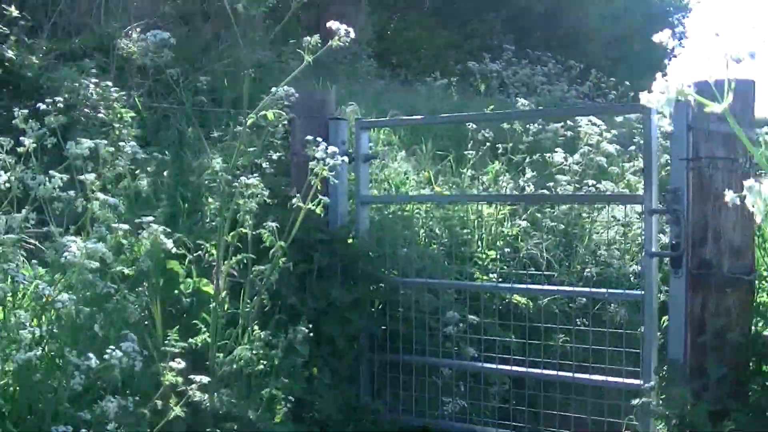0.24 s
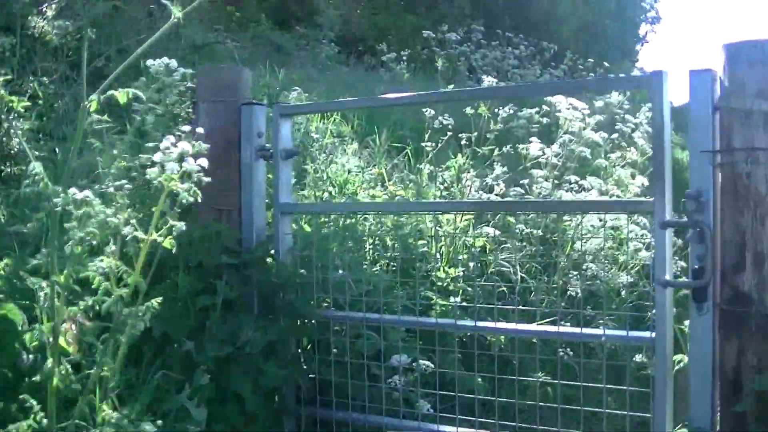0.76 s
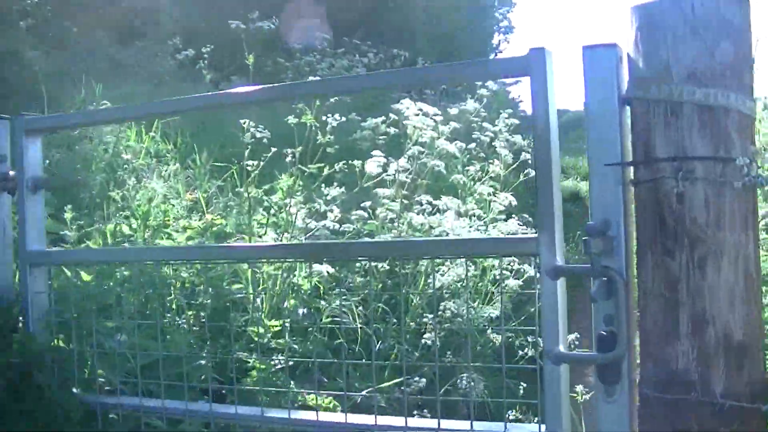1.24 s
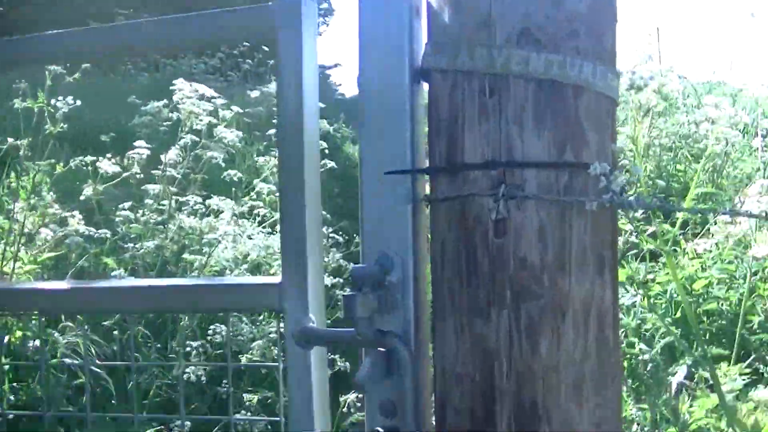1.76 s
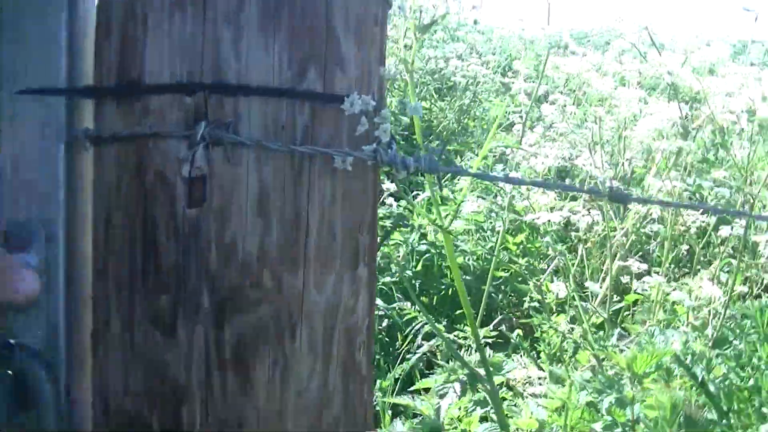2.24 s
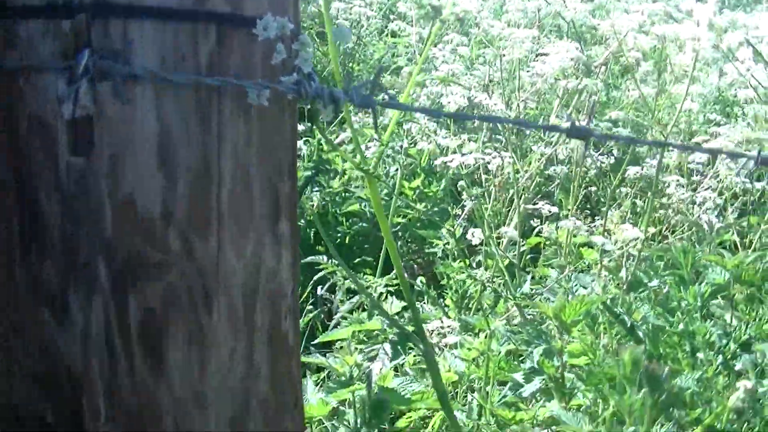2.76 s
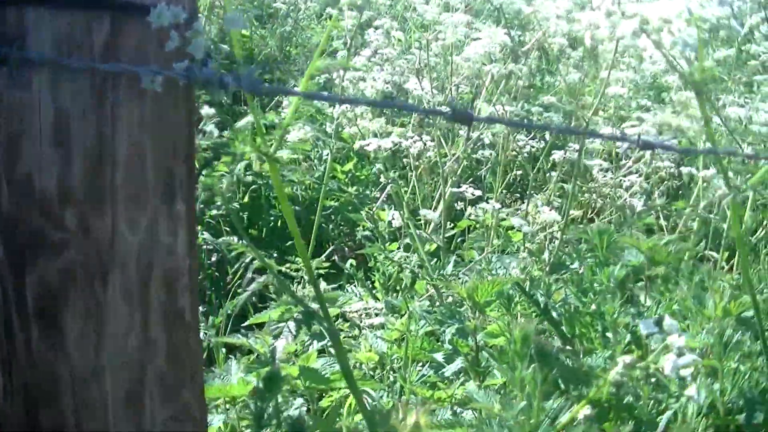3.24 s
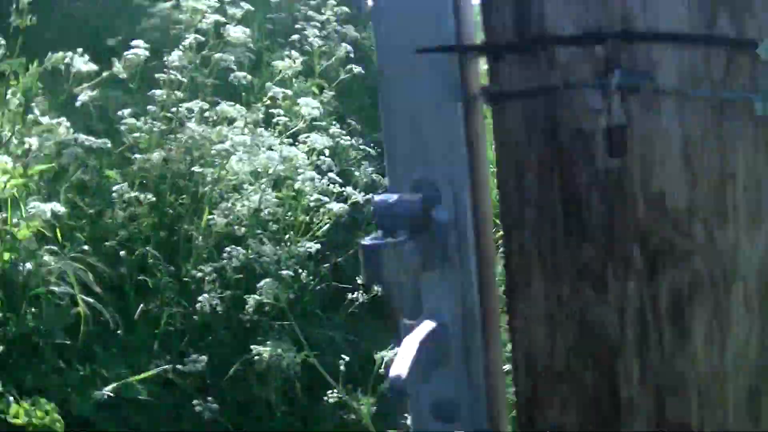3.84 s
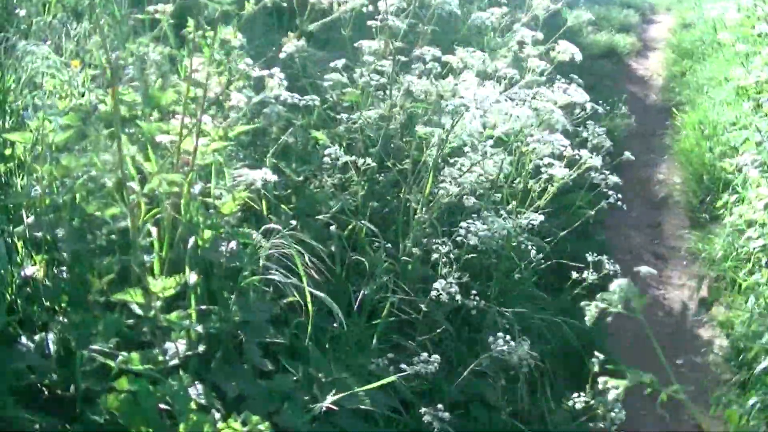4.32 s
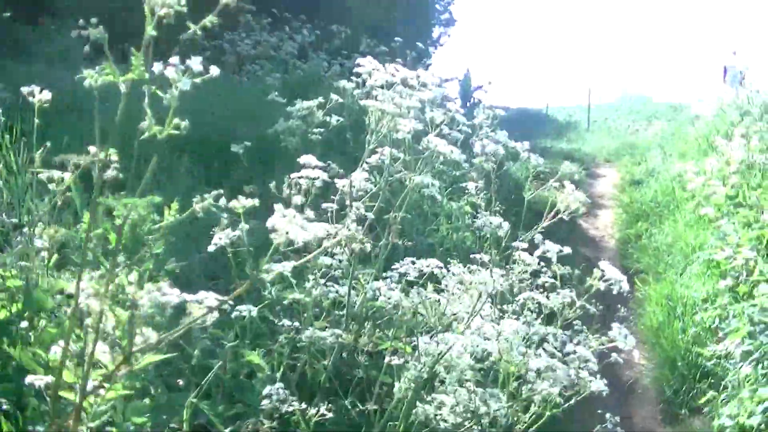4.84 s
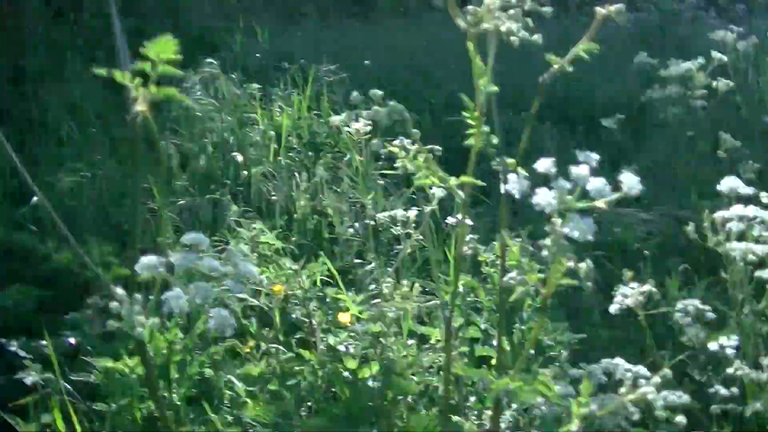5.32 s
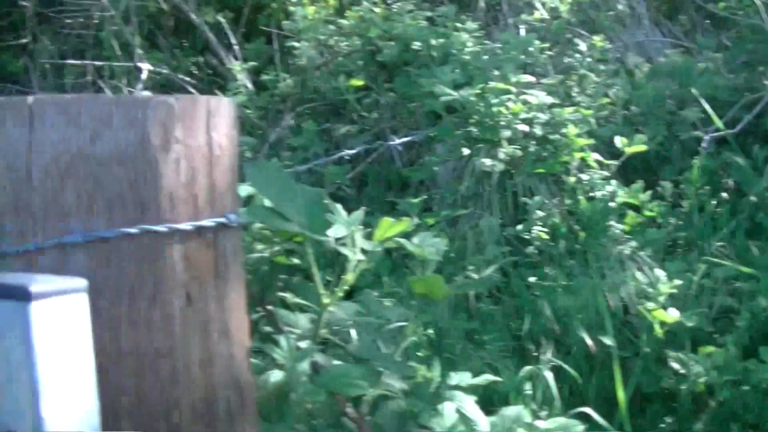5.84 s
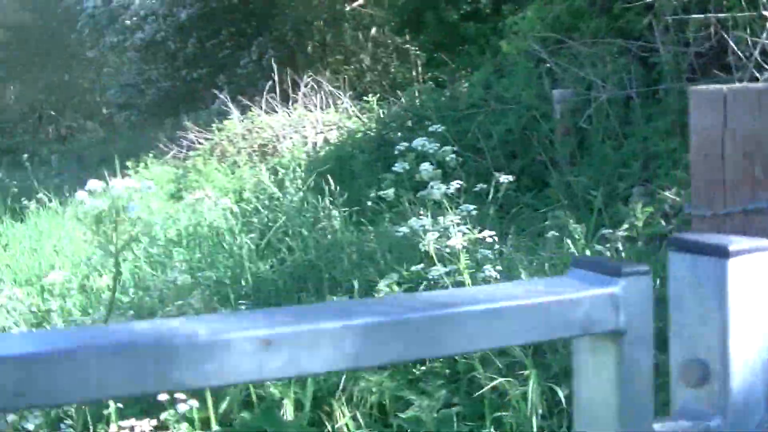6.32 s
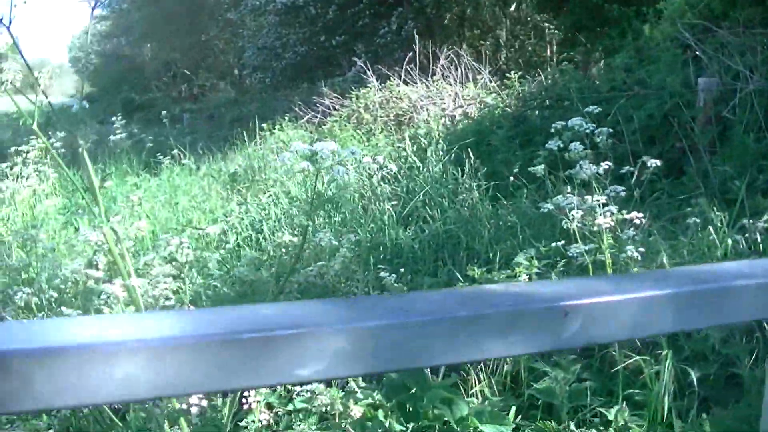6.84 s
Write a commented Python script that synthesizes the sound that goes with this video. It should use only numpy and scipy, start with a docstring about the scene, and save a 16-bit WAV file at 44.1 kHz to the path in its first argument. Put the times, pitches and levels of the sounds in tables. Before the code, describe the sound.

A faint hiss of leaves runs throughout, outdoors on an overgrown path. For the first two seconds soft footsteps swish through grass, with a few small bird chirps around 1 second. At about 2.3 seconds the steel bolt of a gate clinks loudly and close, in a quick cluster, followed by scattered lighter taps and another sharp clink near 3.1. From 3.3 to 3.6 seconds it clatters, scrapes and gives a short, very high squeal. Quiet steps resume from 4.3 seconds. A small bird sings falling notes and short buzzes between 5 and 5.9 seconds, and a twig snaps near 5.5. After one firmer step, the gate slams at about 6.6 seconds with a loud, bright metallic clang and a rattle of wire mesh. The bolt clinks and scrapes home by 6.9 seconds as the ringing fades.

```python
"""The spring bolt of a galvanised field gate clinks in its keeper, then scrapes and squeals as it is drawn.
Impacts excite the free vibration of bolt and post; stick-slip friction sustains the squeal.
Later the gate slams: the tube frame clangs, the wire mesh rattles and the bolt slides home.
Behind it a walker brushes along an overgrown path, small birds sing and leaves rustle."""
import sys
import numpy as np
from scipy import signal
from scipy.fft import rfft, irfft, next_fast_len
from scipy.io import wavfile
from scipy.ndimage import uniform_filter1d

SR = 44100
rng = np.random.default_rng(int(sys.argv[2]) if len(sys.argv) > 2 else 0)


def dump_mix(stems):
    """Bounce the given channels to the path in sys.argv[1] as a 16-bit WAV at rate SR."""
    frames = np.atleast_2d(stems).T  # one column per channel
    limited = np.clip(frames, -1, 1)  # hard clip at full scale
    pcm = np.round(limited * 32767).astype(np.int16)
    wavfile.write(sys.argv[1], SR, pcm)


N = 312228
TIME = np.arange(N) / SR


def amp(db):
    """Amplitude ratio of a level in decibels."""
    return 10 ** (np.asarray(db) / 20)


def unit(x):
    """Normalisation to an rms of one."""
    return x / np.sqrt(np.mean(x ** 2) + 1e-20)


def blend(ends, share):
    """Linear interpolation between two values as share goes from 0 to 1."""
    return ends[0] + (ends[1] - ends[0]) * share


def pan(db):
    """Level difference: stereo gains with the left db above the right."""
    return amp([[db / 2], [-db / 2]])


def curve_at(points, hz):
    """Interpolation on a logarithmic frequency axis."""
    f, value = np.transpose(points)
    return np.interp(np.log(hz + 1), np.log(f), value)


def add(mix, start, sound):
    """Superposition of a sound on the mix from start seconds."""
    part = mix[:, round(start * SR):][:, :sound.shape[1]]
    part += sound[:, :part.shape[1]]


def colour(x, spectrum):
    """Filtering by a spectral envelope in dB."""
    n = x.shape[-1]
    size = next_fast_len(n)
    gain = amp(curve_at(spectrum, np.fft.rfftfreq(size, 1 / SR)))
    return irfft(rfft(x, size) * gain, size)[..., :n]


def high_pass(x, hz):
    """Radiation loss: thin steel and twigs give out little bass."""
    return signal.sosfilt(signal.butter(2, hz, "high", fs=SR, output="sos"), x)


def wobble(n, rate_hz):
    """Random modulation: low-pass noise with an rms of one."""
    f = np.fft.rfftfreq(n, 1 / SR)
    return unit(irfft(rfft(rng.standard_normal(n)) / (1 + (f / rate_hz) ** 4), n))


# Likeness of left and right. Each row: frequency in Hz, correlation.
COHERENCE = [(60, 0.084), (250, 0.22), (600, 0.5), (1300, 0.83), (3000, 0.82), (5000, 0.47), (9000, 0.23),
             (16000, 0.37)]
def noise(n, spectrum, grain=1):
    """Partly coherent stereo noise, narrowest in the mids; an uneven grain makes it crackle."""
    size = next_fast_len(n)
    a, b = rfft(rng.standard_normal((2, n)) * grain, size)
    correlation = np.clip(curve_at(COHERENCE, np.fft.rfftfreq(size, 1 / SR)), -1, 1)
    mid, side = a * np.sqrt(1 + correlation), b * np.sqrt(1 - correlation)
    stereo = irfft(np.array([mid + side, mid - side]), size)[:, :n]
    return unit(colour(stereo, spectrum))


def dense_ring(n, spectrum, decay):
    """Modal overlap: countless modes merge into noise, each band with its own 60 dB decay time."""
    hz, t, bands = signal.stft(noise(n, spectrum), SR, nperseg=256)
    fade = 1e-3 ** (t / curve_at(decay, hz)[:, None])
    return signal.istft(bands * fade, SR, nperseg=256)[1][:, :n]


def ring(n, modes, spread_hz):
    """Free vibration: damped sines, the higher ones further out of phase between left and right."""
    t, out = np.arange(n) / SR, np.zeros((2, n))
    for hz, db, pan_db, t60 in modes:
        phase = 2 * np.pi * rng.random() + np.array([[min((hz / spread_hz) ** 2, 1.4)], [0]])
        out += amp(db) * pan(pan_db) * 1e-3 ** (t / t60) * np.sin(2 * np.pi * hz * t + phase)
    return out * (1 - np.exp(-t / 0.00032))  # the ring builds up during the contact


def scatter(sound, spectrum, decay):
    """Reverberation from foliage: convolution with a diffuse, decaying impulse response."""
    response = dense_ring(SR, spectrum, decay)
    return signal.fftconvolve(sound, response / np.linalg.norm(response[0]), axes=1)[:, :N]


# Spectrum of the leaf hiss. Each row: frequency in Hz, relative level in dB.
LEAF_SPECTRUM = [(18, -56), (30, -22), (161, -16.5), (486, -5.5), (721, -11.5), (1130, -11), (2010, -2),
                 (3060, -0.5), (4420, -4.5), (5040, -4), (7270, -10), (7870, -9.5), (11100, -16),
                 (13300, -14), (16000, -27.5)]
# Level of the background leaf rustle, dipping while the walker pauses.
# Each row: time in seconds, level in dB.
LEAF_RUSTLE_LEVELS = [(0, -53), (1.2, -52.5), (2.3, -52), (2.85, -56.5), (3.7, -52.5), (5.2, -50),
                      (5.8, -52), (7.08, -49.5)]
def leaf_rustle(patchy_db=2, flutter_db=-0.86):
    """Modulated noise: leaves hiss in patches that drift in time and frequency."""
    bands = signal.stft(noise(N, LEAF_SPECTRUM), SR, nperseg=512)[2]
    patches = uniform_filter1d(rng.standard_normal(bands.shape[1:]), size=8, axis=0)
    patches = unit(uniform_filter1d(patches, size=12, axis=1))
    hiss = signal.istft(bands * amp(patchy_db * patches), SR, nperseg=512)[1][:, :N]
    strength = amp(np.interp(TIME, *np.transpose(LEAF_RUSTLE_LEVELS)))
    return unit(hiss) * strength * amp(flutter_db * wobble(N, rate_hz=20)) * pan(0.6)


def glide(hz, octaves):
    """Exponential sweep centred on hz: its first, middle and last pitch."""
    return hz * 2 ** (octaves * np.array([-.5, 0, .5]))


# Single chirps. Each row: start in seconds, length in seconds, pitch in Hz, glide in octaves,
# relative level in dB, rasp as a share of the pitch.
BIRD_CHIRPS = [(0.868, 0.012, 3570, -.55, -33, 0.15), (0.87, 0.011, 5500, -.5, -35.5, 0.14),
               (0.916, 0.017, 3590, .55, -35.5, 0.17), (0.918, 0.02, 5500, .45, -39, 0.085),
               (0.995, 0.019, 2145, .65, -42, 0.034), (1.807, 0.049, 3340, .7, -46.5, .01),
               (3.186, 0.059, 3660, -.15, -47, 0.048), (4.031, 0.093, 4030, .15, -41.5, 0.099),
               (4.852, 0.026, 4290, .15, -38, 0.025)]
# Falling two-voiced slurs open a song. Each row: start in seconds, first pitch in Hz, relative level in dB.
SONG_SLURS = [(4.975, 5470, -40), (5.108, 5390, -45), (5.219, 5680, -45)]
# Buzzes end it. Each row: start in seconds, length in seconds, relative level in dB.
SONG_BUZZES = [(5.496, .04, -33), (5.595, 0.046, -35.5), (5.682, 0.044, -36.5), (5.736, 0.08, -48),
               (5.806, 0.057, -37)]
def bird_notes(twitters=8, twitter_span_s=(0.92, 1.6), twitter_hz=(3050, 4580), slur_s=0.084):
    """Pitch contours, each as start and length in seconds, three pitches in Hz, level in dB, rasp."""
    notes = [(start, length, glide(hz, octaves), db, rasp)
             for start, length, hz, octaves, db, rasp in BIRD_CHIRPS]
    for when, pitch, direction in rng.random((twitters, 3)):  # a far bird twitters at random
        sweep = glide(blend(twitter_hz, pitch), octaves=0.34 * np.sign(direction - .5))
        notes.append((blend(twitter_span_s, when), .035, sweep, -49, 0.0092))
    fall = np.linspace(0, 1, 3) ** 1.5
    for start, hz, db in SONG_SLURS:
        lower, upper = hz * 2 ** (-0.29 * fall), 1.24 * hz * 2 ** (-0.087 * fall)
        notes += [(start, slur_s, lower, db, 0.021), (start, slur_s, upper, db - 6.5, 0.021)]
    return notes + [(start, length, (4950, 4560, 4620), db, .048) for start, length, db in SONG_BUZZES]


def birds(direct_db=-1, echo_db=-3):
    """Frequency modulation makes gliding whistles raspy; hedge and trees scatter them."""
    song = np.zeros((2, N))
    for start, length, pitches, db, rasp in bird_notes():
        progress = np.arange(round(length * SR)) / (length * SR)
        hz = np.polyval(np.polyfit([0, .5, 1], pitches, 2), progress)
        hz *= 1 + rasp * wobble(SR // 4, rate_hz=740)[:len(progress)]
        whistle = np.sin(2 * np.pi * np.cumsum(hz) / SR)
        add(song, start, amp(db) * np.sin(np.pi * progress) * whistle[None])
    echo = scatter(song, spectrum=[(1000, 0), (8000, 0)], decay=[(2000, 0.18), (7000, 0.65)])
    return amp(direct_db) * song + amp(echo_db) * echo


# Steps in grass. Each row: start in seconds, length in seconds, swish level in dB, weight from 0 to 1.
FOOTFALLS = [(0.19, 0.041, -50.5, .6), (0.418, 0.12, -45.5, 0.28), (0.72, 0.062, -49, 0.94),
             (0.96, 0.064, -45.5, 0.4), (1.175, 0.14, -49.5, 0.48), (1.671, 0.046, -42.5, 0.77),
             (2.128, 0.035, -34, 0.57), (4.297, 0.049, -40.5, 0.45), (4.476, 0.06, -44, .15),
             (4.744, 0.13, -37.5, 0.01), (4.969, 0.0093, -39, 0.83), (5.149, 0.12, -48.5, .5),
             (5.361, 0.07, -43.5, 0.23), (5.578, 0.084, -46.5, .25), (6.387, 0.067, -31.5, 0.59)]
# Spectra of stems, footfall and twig. Each row: frequency in Hz, relative level in dB.
SWISH_SPECTRUM = [(120, -70), (200, -45), (432, -12), (806, -15.5), (2470, -1.5), (4430, -6), (6880, -6),
                  (9060, -15), (13600, -16), (16000, -21)]
THUD_SPECTRUM = [(40, -24), (130, -17), (300, 12), (480, 11.5), (800, -5), (2000, -17), (8000, -70)]
SNAP_SPECTRUM = [(100, -36), (650, 2), (1300, -26), (2000, 0), (3200, -4), (5000, -7), (16000, -16)]
def steps(grain_db=3, snap_at_s=5.55, snap_db=-20):
    """Friction, impact and fracture: stems crackle on the legs, feet thud and one twig snaps."""
    out, n = np.zeros((2, N)), SR // 4
    t = np.arange(n) / SR
    for start, length, swish_db, weight in FOOTFALLS:
        thud_db = swish_db + blend((-31, -8.5), weight)
        tilt_db_per_octave = blend((1, -5), weight)  # more weight, duller swish
        swell = np.interp(t / length, [0, .08, .7, 1.2], [0, 1, .85, 0])
        spectrum = [(hz, db + tilt_db_per_octave * np.log2(hz / 3000)) for hz, db in SWISH_SPECTRUM]
        swish = noise(n, spectrum, grain=amp(grain_db * wobble(n, rate_hz=1600)))
        add(out, start, swell * (amp(swish_db) * swish + amp(thud_db) * noise(n, THUD_SPECTRUM)))
    snap = amp(snap_db) * noise(n, SNAP_SPECTRUM) * np.exp(-t / .002)
    add(out, snap_at_s, high_pass(snap, hz=400))
    return out


# Blows of the gate on its post. Each row: start in seconds, relative crack and ring levels in dB.
GATE_BLOWS = [(6.568, -8.5, -19.5), (6.578, -23, -45), (6.613, -31, -25), (6.6184, -39, -37),
              (6.6216, -34, -24), (6.643, -29, -33.5), (6.658, -28, -23), (6.7249, -12, -34),
              (6.813, -22, -58)]
# Strongest frame modes, and the gate's broad spectrum. Each row: frequency in Hz, relative level in dB.
FRAME_MODES = [(328, -38), (965, -29), (1041, -26), (1340, -21), (1604, -21), (2168, -18), (2615, -13),
               (2675, -11), (2850, -8), (2977, 4), (3031, -1), (3083, -6), (3128, -7), (3176, -4),
               (3281, -10), (3646, -11), (3896, -9), (4016, -9), (4163, -12), (4889, -9), (5344, -11),
               (5542, -10), (9460, -20)]
GATE_SPECTRUM = [(24, -77), (40, -53), (231, -57), (320, -47), (382, -43), (715, -42), (990, -27.5),
                 (1720, -33.5), (1900, -15.5), (2440, -14), (3060, 1), (4570, -13.5), (5050, -7),
                 (12800, -23), (16000, -42)]
# Damping of the gate. Each row: frequency in Hz, 60 dB decay time in seconds.
GATE_T60 = [(60, .5), (400, 2.4), (1200, 1.7), (3000, 0.86), (5500, 0.67), (8000, 0.32), (15000, 0.46)]
def gate(crack_s=.0035, modes_db=-24, rattle_db=-16.5, bass_db=-6):
    """Impact excitation: blows set the tube frame ringing and shake the mesh."""
    out, n = np.zeros((2, N)), SR * 3 // 5
    for start, crack_db, ring_db in GATE_BLOWS:
        crack = noise(n, GATE_SPECTRUM) * np.exp(-np.arange(n) / SR / crack_s)
        add(out, start, amp(crack_db) * crack + amp(ring_db) * dense_ring(n, GATE_SPECTRUM, GATE_T60))
    modes = [(hz, db, 0, curve_at(GATE_T60, hz)) for hz, db in FRAME_MODES]
    add(out, GATE_BLOWS[0][0], amp(modes_db) * ring(n, modes, spread_hz=16000))
    out += amp(rattle_db) * mesh_rattle()
    return (high_pass(out, hz=223) + amp(bass_db) * out) * pan(1)


def mesh_rattle(taps_per_s=300, spread_db=5, tap_s=.003, fade_db_per_s=152):
    """Shot noise: the wire mesh taps the frame at random and settles after each blow."""
    taps = (rng.random(N) < taps_per_s / SR) * amp(spread_db * rng.standard_normal(N))
    tap_envelope = signal.lfilter([1], [1, -np.exp(-1 / (tap_s * SR))], taps)
    shakes = [(TIME >= start) * amp(crack_db - fade_db_per_s * abs(TIME - start))
              for start, crack_db, _ in GATE_BLOWS]
    return np.linalg.norm(shakes, axis=0) * noise(N, GATE_SPECTRUM, grain=tap_envelope)


# Spectrum of a contact in the latch. Each row: frequency in Hz, relative level in dB.
CONTACT_SPECTRUM = [(40, -23), (300, -29), (700, -9), (1100, -18), (1800, -11.5), (3000, 3.5), (4200, 6),
                    (5800, -7.5), (6700, 7.5), (8500, -10), (11000, -4.5), (16000, -39)]
# Damping of the latch's weak modes. Each row: frequency in Hz, 60 dB decay time in seconds.
LATCH_T60 = [(100, 0.41), (1500, 0.067), (3000, 0.15), (6000, 0.066), (10000, 0.033), (16000, 0.019)]
def knock(n, hardness, treble_db, mid_db=-19, crack_db=-8, crack_s=.0045, body_db=-22):
    """Contact time sets bandwidth: a harder knock rises faster and carries more treble."""
    tilt = [(700, blend((-10.5, -26), hardness)), (1900, blend((1, -33), hardness)), (3600, mid_db),
            (6500, (mid_db + treble_db) / 2), (10000, treble_db), (16000, blend((-64, -5), hardness))]
    spectrum = [(hz, db + curve_at(tilt, hz)) for hz, db in CONTACT_SPECTRUM]
    t = np.arange(n) / SR
    crack = amp(crack_db) * noise(n, spectrum) * np.exp(-t / crack_s)
    body = amp(body_db) * dense_ring(n, spectrum, LATCH_T60)
    rise_s = blend((0.00049, .0001), hardness)
    return (crack + body) * (1 - np.exp(-t / rise_s))


# Knocks of the bolt on its keeper. Each row: start in seconds, strength in dB, hardness from 0 to 1,
# relative level of the post's ring in dB.
LATCH_KNOCKS = [(2.3426, 2, 0.78, -22), (2.363, -4, 0.15, -17), (2.3906, -14, 0.16, -26),
                (2.4379, 0.5, 0.79, -24), (2.6219, -25.5, 0.06, -34), (2.657, -31, 0.8, -36),
                (2.6953, -12.5, 0.08, -25), (2.8973, -25, 0, -42.5), (2.9402, -11, 0.04, -24),
                (3.1168, -1, 0.78, -22), (3.3159, -6, 0.24, -21.5), (3.3737, -4, 0.91, -45),
                (3.398, -2, 0.85, -23.5), (3.4064, 1, 0.7, -30), (3.4934, -0.5, 1, -24.5),
                (3.5404, -11, 1, -23), (3.589, -18, 0.5, -30), (4.022, -29.5, 0.14, -38.5),
                (6.7281, -2, 0.33, -21), (6.8129, -8.5, 0.42, -21.5), (6.8534, -15, 0, -23.5),
                (6.9102, -15.5, 0.2, -30.5)]
# Modes of the post. Each row: frequency in Hz, relative level in dB, unscaled decay time in seconds.
POST_MODES = [(1455, -16, .13), (1565, -10, .15), (2065, -11, .11), (2283, -13, .17), (2742, 1, .13),
              (2850, -8, .2), (2965, -7, .17), (3085, -9, .13), (3282, -6, .15), (3950, -6, .09),
              (4377, -10, .08), (5044, -12, .12), (5240, -8, .11), (6645, -14, .13)]
# Modes of the bolt. Each row: frequency in Hz, relative level in dB, left over right in dB,
# unscaled decay time in seconds.
BOLT_MODES = [(1574, -12, 2, .1), (1928, -7, 0, .1), (2020, -10, 0, .1), (2115, -10, 0, .1),
              (2282, -6, 0, .1), (3230, -8, 1, .1), (3280, -4, 1, .15), (5346, 0, -1, .12),
              (6606, -2, 9, .1), (10501, -11, 0, .07), (11347, -5, -1, .15), (12150, -17, 0, .1),
              (13887, -8, -6, .08), (15338, 0, -6, .09)]
def latch(post_decay_scale=0.63, bolt_decay_scale=0.65, bass_db=-24):
    """Modal response: each knock rings post and bolt; a soft one favours the post's middle modes."""
    out, n = np.zeros((2, N)), SR // 3
    for start, db, hardness, post_db in LATCH_KNOCKS:
        treble_db = blend((-36, -12.5), hardness)
        bolt_db = db + blend((-48.5, -17), hardness)
        contact = amp(db) * knock(n, hardness, treble_db)
        rolloff_db = 0.15 * max(-15 - treble_db, 0)
        # no two knocks land on the same spot, so the modes trade strength
        post_spot_db, bolt_spot_db = 2.2 * rng.standard_normal((2, len(POST_MODES) + len(BOLT_MODES)))
        post_modes, bolt_modes = [], []
        for (hz, mode_db, t60), spot_db in zip(POST_MODES, post_spot_db):
            loss_db = rolloff_db * np.sqrt(abs(np.log2(hz / 2742)))
            post_modes.append((hz, mode_db + spot_db - loss_db, 0, t60 * post_decay_scale))
        for (hz, mode_db, pan_db, t60), spot_db in zip(BOLT_MODES, bolt_spot_db):
            loss_db = 2 * rolloff_db * max(np.log2(hz / SQUEAL_HZ), 0)
            bolt_modes.append((hz, mode_db + spot_db - loss_db, pan_db, t60 * bolt_decay_scale))
        post_ring = amp(post_db) * ring(n, post_modes, spread_hz=15000)
        bolt_ring = amp(bolt_db) * ring(n, bolt_modes, spread_hz=21000)
        add(out, start, contact + post_ring + bolt_ring)
    return high_pass(out, hz=1040) + amp(bass_db) * out


def stroke(start, length, db, slope_db_per_s, attack_s=0.0025, release_db_per_s=624):
    """Amplitude envelope of one slide: a quick attack, a sloping hold and a release."""
    t = np.maximum(TIME - start, 0)
    level_db = db + slope_db_per_s * np.minimum(t, length) - release_db_per_s * np.maximum(t - length, 0)
    return np.minimum(t / attack_s, 1) * amp(level_db)


SQUEAL_HZ = 6606
# Slides of the bolt. Each row: start in seconds, length in seconds, scrape level in dB,
# squeal level in dB, fade in dB per second as the bolt slows.
BOLT_SLIDES = [(2.634, 0.097, -49.5, -51, 38), (3.391, 0.083, -29, -42, 201), (3.492, .11, -24.5, -24, 64),
               (6.73, 0.2, -29.5, -52, 58)]
def sliding_bolt(bind_at_s=3.374, bind_s=.116, squeal_pan_db=11, grain_db=4):
    """Stick-slip friction keeps one mode of the bolt squealing, stirs the others and scrapes the keeper."""
    squeal = stroke(bind_at_s, bind_s, db=-27, slope_db_per_s=89)  # builds while the bolt binds
    scrape = np.zeros(N)
    for start, length, scrape_db, squeal_db, fade in BOLT_SLIDES:
        squeal += stroke(start, length, squeal_db, -fade)
        scrape += stroke(start, length, scrape_db, -fade)
    tone = np.sqrt(2) * np.sin(2 * np.pi * np.cumsum(SQUEAL_HZ + 3 * wobble(N, rate_hz=41)) / SR)
    sides = pan(squeal_pan_db)
    out = squeal * tone * sides / sides.mean()
    out += scrape * rubbing(grain_db) + driven_modes(scrape, squeal)
    freed_ring = ring(SR, [(3250, -38, 0, 0.79)], spread_hz=7000)  # once free, the bolt rings on
    add(out, bind_at_s + bind_s, freed_ring)
    return out


# Spectrum of steel sliding on steel. Each row: frequency in Hz, relative level in dB.
FRICTION_SPECTRUM = [(60, -20), (700, -14.5), (1300, -4), (2000, 2), (3300, 9.5), (4500, -1.5), (8000, 0),
                     (11000, -21), (16000, -32)]
def rubbing(grain_db):
    """Friction noise: a grainy hiss of the bolt against its keeper."""
    return noise(N, FRICTION_SPECTRUM, grain=unit(amp(grain_db * wobble(N, rate_hz=100))))


def driven_modes(scrape, squeal, flutter_db=2):
    """Forced vibration: the bolt's low modes follow the scrape; high ones need a hard scrape or a squeal."""
    low_drive = amp(1) * scrape
    high_drive = amp(29) * scrape ** 2.08 + amp(-17) * squeal
    out, flutter = np.zeros((2, N)), wobble(N, rate_hz=85)
    for hz, db, pan_db, _ in BOLT_MODES:
        mode_flutter = np.roll(flutter, rng.integers(N))
        phase = 2 * np.pi * hz * TIME + .5 * mode_flutter[::-1] + np.array([[(hz / 11000) ** 2], [0]])
        drive = high_drive if hz > 8000 else low_drive
        out += drive * amp(db + flutter_db * mode_flutter) * pan(pan_db) * np.sin(phase)
    return out


def scene(echo_db=-23.5):
    """Superposition of all sources, with a faint scatter of the metal sounds from the hedge."""
    metal = latch() + sliding_bolt() + gate()
    echo = scatter(metal, spectrum=[(200, 0), (3000, -8.5), (6000, -14), (14000, -34)],
                   decay=[(500, 0.27), (3000, 0.53), (10000, .4)])
    return metal + amp(echo_db) * echo + steps() + birds() + leaf_rustle()


def record(dry, ceiling=.93, cutoff_hz=16500):
    """Soft saturation rounds the peaks just under full scale; a low-pass filter limits the band."""
    limited = dry / (1 + (dry / ceiling) ** 10) ** (1 / 10)
    low_pass = signal.firwin(255, cutoff_hz, window=("kaiser", 9), fs=SR)
    return signal.oaconvolve(limited, low_pass[None], "same")


dry = scene()
out = record(dry)
dump_mix(out)
```